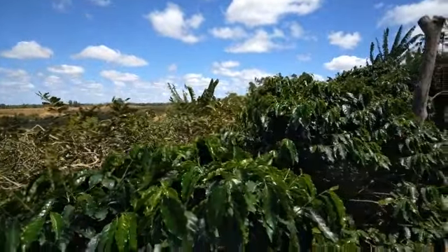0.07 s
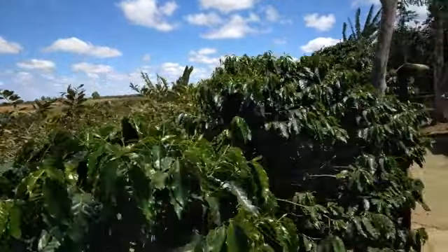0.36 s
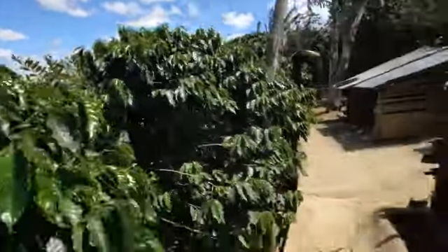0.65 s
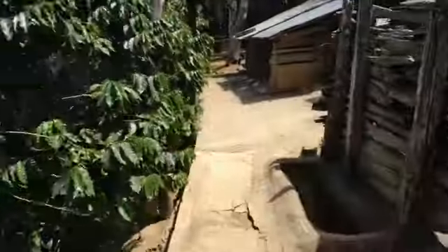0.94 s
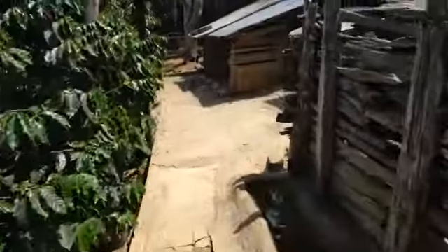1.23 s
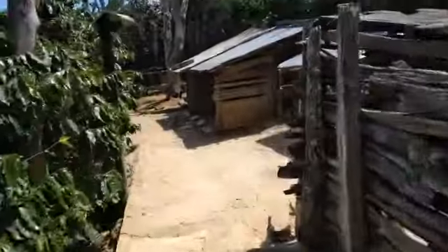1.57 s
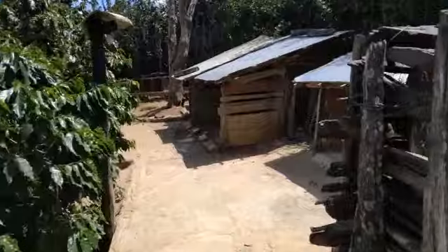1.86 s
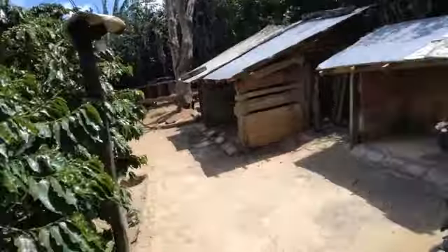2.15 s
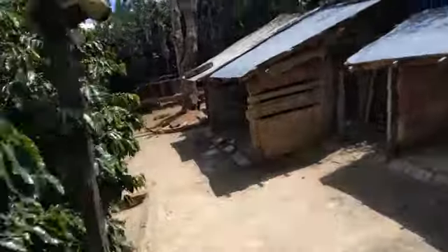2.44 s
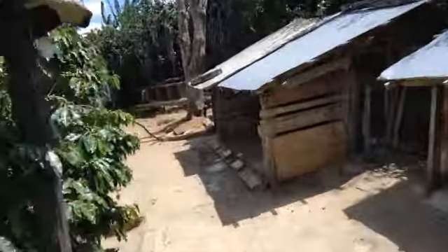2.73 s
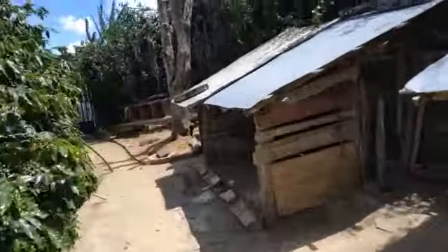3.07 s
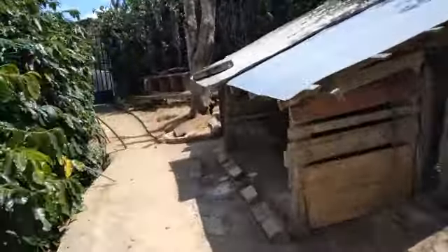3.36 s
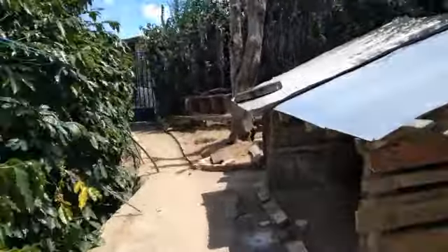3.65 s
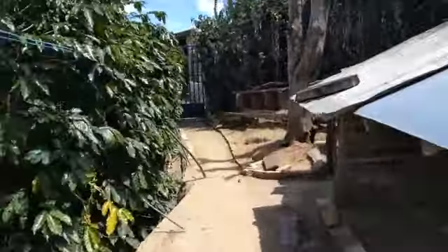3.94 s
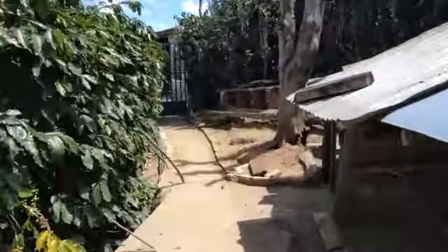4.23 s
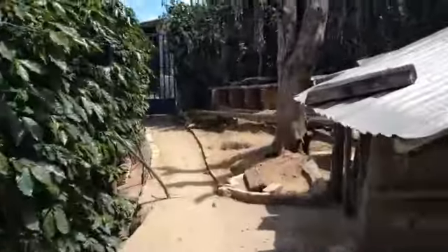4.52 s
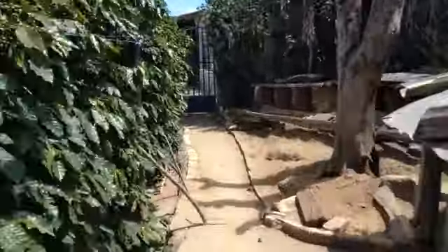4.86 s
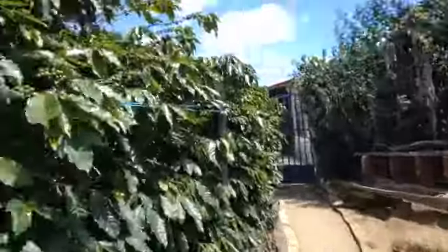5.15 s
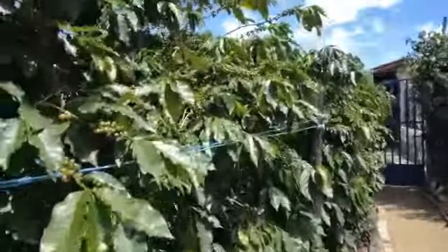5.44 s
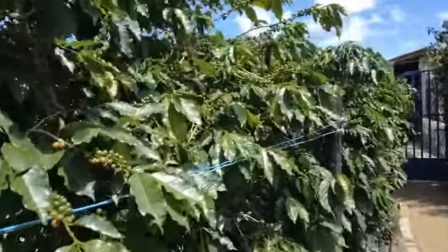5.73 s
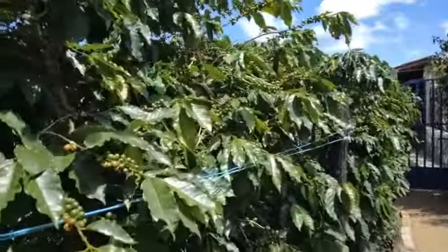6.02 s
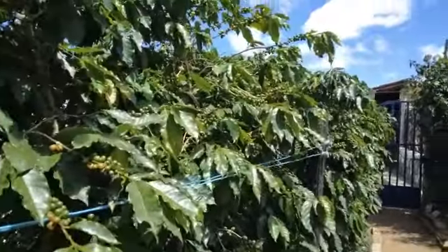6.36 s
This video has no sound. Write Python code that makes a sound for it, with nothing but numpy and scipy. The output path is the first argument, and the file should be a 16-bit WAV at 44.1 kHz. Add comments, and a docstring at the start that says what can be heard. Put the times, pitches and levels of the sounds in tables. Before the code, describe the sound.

Someone walks along a packed dirt path in a quiet yard, carrying a small stereo microphone. Air rumbles and puffs against it while soles and clothing swish, grit cracks, and the hand rubs and knocks on the hollow case. The swishes peak just past the middle, then the strongest gusts hit the left side. A few last swishes leave only soft rumble, faint rubbing and hush.

```python
"""Someone walks a packed dirt path in a quiet yard, carrying a small stereo camera.
From the start, moving air rumbles and puffs at the two microphone ports over a steady hush. Soles and
clothing swish with each stride, grit cracks underfoot, the hand rubs the hollow case, and footfalls
and fingers knock on it. The swishes peak just before 4 s and the strongest gusts hit the left port
near 5 s; a last few swishes then leave only soft rumble, faint rubbing and hush."""
import sys
import numpy as np
from scipy import signal
from scipy.fft import rfft, irfft
from scipy.io import wavfile
from scipy.ndimage import map_coordinates

SR = 44100
rng = np.random.default_rng(int(sys.argv[2]) if len(sys.argv) > 2 else 0)


def wrap_up_sound(samples):
    """Save the sound to the file named by the first command line argument, as 16-bit audio."""
    columns = np.atleast_2d(samples).T
    # keep every value between -1 and 1, then stretch to whole-number steps
    tamed = np.clip(columns, -1, 1)
    steps = np.round(tamed * 32767).astype(np.int16)
    wavfile.write(sys.argv[1], SR, steps)


N = 286209
TIME, BINS = np.arange(N) / SR, np.fft.rfftfreq(N, 1 / SR)

# boxy tone of rubbing that reaches the microphones through the case: freq_hz, gain_db
CASE_TONE = [(120, -5.5), (220, -5.5), (280, -6), (410, -4), (560, -6), (850, -14.5), (1100, -23.5),
             (1600, -33), (4000, -34.5)]


def gain_of(db):
    """Decibels to amplitude."""
    return 10 ** (np.asarray(db) / 20)


def unit_rms(x):
    """Scales to an rms of 1."""
    return x / np.sqrt(np.mean(x ** 2) + 1e-20)


def curve(points, hz, column=1):
    """One column of a spectrum table, joined on a log-frequency axis."""
    table = np.array(points, float)
    return np.interp(np.log(hz + 1), np.log(table[:, 0] + 1), table[:, column])


def add(mix, start_s, sound):
    """Mixes a sound in from start_s."""
    part = mix[:, max(round(start_s * SR), 0):][:, :sound.shape[-1]]
    part += sound[..., :part.shape[1]]


def pan(pan_db):
    """Left and right gains of mean power 1; positive leans left."""
    pair = np.array([gain_of(pan_db / 2), gain_of(-pan_db / 2)]).reshape(2, -1)
    return pair / np.sqrt((pair ** 2).mean(0))


def swell(peak_s, half_s):
    """A bell-shaped fade in and out, of height 1."""
    return np.exp(-((TIME - peak_s) / half_s) ** 2)


def drift(size, step):
    """Smooth random wander of rms 1, with a new value every step points."""
    knots = rng.standard_normal(size // step + 3)
    return unit_rms(map_coordinates(knots, [np.arange(size) / step], order=2, mode="nearest"))


def noise(colour_db, size, likeness=1):
    """Coloured stereo noise of rms 1; likeness 0 makes the two sides independent."""
    # how alike the two ports sound at likeness 1: freq_hz, correlation
    port_correlation = [(60, 1), (160, 0.77), (280, 0.96), (500, 0.79), (800, 0.46), (1300, -0.054),
                        (2200, 0.17), (3500, -0.11), (5000, -0.15), (6200, 0.27), (8500, 0.86),
                        (10500, 0.075), (14500, 0.98)]
    hz = np.fft.rfftfreq(size, 1 / SR)
    left, independent = rfft(rng.standard_normal((2, size)))
    shared = np.clip(likeness * curve(port_correlation, hz), -1, 1)
    right = shared * left + np.sqrt(1 - shared ** 2) * independent
    return unit_rms(irfft(np.array([left, right]) * gain_of(colour_db), size))


def hush(level_db=-71, pan_db=2.0):
    """The yard and the electronics lay a steady noise bed under everything."""
    # tone of the bed: freq_hz, gain_db
    hush_tone = [(100, 29), (400, 30), (800, 11.5), (1300, 7.5), (2500, 3.5), (5000, 4), (7200, 1),
                 (10000, -1), (15500, 2.5)]
    return gain_of(level_db) * noise(curve(hush_tone, BINS), N, likeness=0.67) * pan(pan_db)


def hums():
    """Now and then a faint low tone swells out of the rumble."""
    # brief hums: peak_s, level_db, pitch_hz, half_length_s
    hum_cues = [(2.534, -59, 109.4, 0.11), (3.733, -56.5, 125.2, 0.072), (5.34, -55.5, 114.3, 0.092),
                (6.163, -64, 142.2, 0.074)]
    return sum(gain_of(level_db) * np.sin(2 * np.pi * pitch_hz * TIME) * swell(peak_s, half_s)
               for peak_s, level_db, pitch_hz, half_s in hum_cues)


def air(swing_db=3, buffet_db=-9, buffet_pan_db=2, wander_db=0.95):
    """Eddies rumble unevenly at each port as the camera moves; gusts buffet mostly one port."""
    # level ride of the air passing the swinging camera: time_s, level_db
    flow_ride = [(0.0, -50.5), (0.11, -43.5), (0.25, -53.5), (0.72, -44.5), (1.0, -50), (1.24, -46.5),
                 (1.8, -48.5), (2.38, -43), (2.55, -54.5), (2.8, -48), (3.18, -54.5), (3.36, -42),
                 (3.62, -54), (3.97, -43), (4.3, -50.5), (4.75, -45.5), (5.3, -46.5), (5.5, -56.5),
                 (6.49, -54.5)]
    # sub-bass tone of the slow pressure swings: freq_hz, gain_db
    swing_tone = [(3, 11), (10, 8.5), (25, 8.5), (45, -1), (70, -25.5), (150, -67)]
    # bass tone of the buffeting: freq_hz, gain_db
    buffet_tone = [(25, -10.5), (55, 2), (85, -2.5), (130, -9.5), (190, -17), (300, -27), (700, -79.5)]
    # gusts on the ports: peak_s, level_db, half_length_s, pan_db
    gust_cues = [(0.13, -56.5, 0.16, 7), (0.349, -47.5, 0.079, -13), (0.615, -47, 0.1, 6.5),
                 (0.92, -51, 0.21, 9), (1.55, -43, 0.086, 11), (2.256, -57, 0.18, -4),
                 (3.5, -52.5, 0.06, 8), (3.97, -54, 0.12, 15), (4.653, -48.5, .06, -3.5),
                 (4.804, -40, 0.047, 18), (4.96, -41.5, 0.097, 20)]
    flow = gain_of(np.interp(TIME, *np.transpose(flow_ride)) + wander_db * drift(N, 2800))
    swings = gain_of(swing_db) * flow * noise(curve(swing_tone, BINS), N, likeness=0)
    buffet_power = (gain_of(buffet_db) * flow * pan(buffet_pan_db)) ** 2
    for peak_s, level_db, half_s, pan_db in gust_cues:
        buffet_power += (gain_of(level_db) * swell(peak_s, half_s) * pan(pan_db)) ** 2
    return swings + np.sqrt(buffet_power) * noise(curve(buffet_tone, BINS), N, likeness=0.28)


def puffs(trim_db=-3, half_cycles=0.67):
    """A few eddies thump a port with a single push and pull."""
    # puffs of air: centre_s, level_db (before trim), pitch_hz, pan_db
    puff_cues = [(0.099, -32, 41, 9), (0.619, -33.5, 42.6, 6), (0.734, -32, 35, -22), (1.385, -43, 109, -4),
                 (1.501, -32, 89, 25), (2.198, -33, 52, -6), (3.519, -31, 57.6, 29),
                 (4.795, -25.5, 72.4, 24), (4.98, -31, 187, 26), (4.9877, -21.5, 89, 40)]
    out, t = np.zeros((2, N)), np.arange(-SR // 20, SR // 20) / SR
    for centre_s, level_db, pitch_hz, pan_db in puff_cues:
        puff = np.sin(2 * np.pi * pitch_hz * t) * np.exp(-(t * pitch_hz / half_cycles) ** 2)
        add(out, centre_s + t[0], gain_of(level_db + trim_db) * puff * pan(pan_db))
    return out


def case_ring(pitch_hz, t60_s, upper_hz=830, upper_t60_s=0.013, attack_s=0.00029, size=6000):
    """The main mode of the case and a faint upper mode, muffled by the soft hand."""
    t = np.arange(size) / SR
    main = np.sin(2 * np.pi * pitch_hz * t) * gain_of(-60 * t / t60_s)
    upper = 0.05 * np.sin(2 * np.pi * upper_hz * t) * gain_of(-60 * t / upper_t60_s)
    attack = 1 - np.exp(-t / attack_s)
    muffle = signal.butter(3, 1100, fs=SR, output="sos")
    return signal.sosfilt(muffle, -(main + upper) * attack)


def grip(rub_db=-2.5, creak_db=-4, flutter_db=2.5, creaks_per_s=170):
    """Skin rubs the case unevenly and small slips ring it; a sliding hand adds a brighter dry rub."""
    # level ride of the hand on the case: time_s, level_db
    grip_ride = [(0.0, -67), (0.42, -70.5), (0.55, -63), (1.1, -63), (1.8, -58.5), (1.95, -66),
                 (2.15, -64.5), (2.42, -66.5), (2.56, -62), (3.0, -63.5), (3.38, -69), (3.8, -60),
                 (4.2, -67), (4.45, -68.5), (4.95, -64), (5.5, -72), (6.0, -69.5), (6.49, -69)]
    # slides of the hand: peak_s, level_db, half_length_s
    slide_cues = [(0.61, -68.5, 0.068), (0.945, -73, 0.046), (1.503, -84, 0.072), (1.79, -66, 0.094),
                  (3.666, -72, 0.12)]
    # tone of dry skin sliding: freq_hz, gain_db
    skin_tone = [(300, -12), (600, 7.5), (900, 5), (1100, -11), (1350, -24.5), (2500, -50)]
    flutter = gain_of(flutter_db * drift(N, 900))
    slips = rng.uniform(-1.13, 1, N) * (rng.random(N) < creaks_per_s / SR)
    ring = case_ring(pitch_hz=392.5, t60_s=0.028)
    creaks = gain_of(creak_db) * unit_rms(signal.oaconvolve(slips, ring)[:N])
    rub = gain_of(rub_db) * noise(curve(CASE_TONE, BINS), N)
    hollow = gain_of(np.interp(TIME, *np.transpose(grip_ride))) * (rub + creaks)
    sliding = sum(gain_of(level_db) * swell(peak_s, half_s) for peak_s, level_db, half_s in slide_cues)
    return flutter * (hollow + sliding * noise(curve(skin_tone, BINS), N))


def snap(hit_s, level_db, centre_hz, t60_s, narrowness_db=7, size=4096):
    """A short noise burst in one broad band, its top dulled by dust; returns (start_s, sound)."""
    hz = np.fft.rfftfreq(size, 1 / SR)
    t = np.arange(size) / SR - 0.005  # pre-roll gives the filter room ahead of the hit
    decay = gain_of(-60 * np.maximum(t, 0) / t60_s) * (t >= 0)
    burst = noise(np.zeros(len(hz)), size) * decay
    dust_db = curve([(11000, 8), (14000, -5)], hz)
    band = unit_rms(gain_of(dust_db - narrowness_db * np.log2((hz + 50) / centre_hz) ** 2))
    return hit_s + t[0], gain_of(level_db) * irfft(rfft(burst) * band, size)


def grit(trim_db=-7):
    """Single grains crack under the sole, each in its own band."""
    # snaps and crunches: start_s, level_db (before trim), centre_hz, t60_s
    grit_cues = [(0.4904, -42.5, 9550, 0.015), (0.4937, -49.5, 3400, 0.018), (0.522, -63, 795, 0.029),
                 (1.363, -65, 1240, 0.038), (1.371, -45.5, 1090, 0.07), (1.908, -42, 2200, .016),
                 (1.985, -55, 3020, .018), (2.387, -56, 2800, 0.048), (2.417, -38, 10500, .007),
                 (2.929, -45.5, 4620, 0.075), (2.936, -48, 3050, 0.049), (3.441, -36.5, 6600, 0.0062),
                 (3.537, -60, 2480, .03), (4.027, -67, 5000, 0.018), (4.427, -66.5, 7800, 0.053),
                 (4.467, -48.5, 1200, 0.011), (4.892, -35.5, 1370, 0.018)]
    out = np.zeros((2, N))
    for start_s, level_db, centre_hz, t60_s in grit_cues:
        add(out, *snap(start_s, level_db + trim_db, centre_hz, t60_s))
    return out


def knocks(case_hz=420, loaded_t60_s=0.01, crack_db=-20.5):
    """Footfalls and shifting fingers jolt the case: a hollow ring with a short crack on top."""
    # dull knocks: start_s, level_db, t60_s
    knock_cues = [(0.323, -54, 0.053), (0.492, -41, 0.024), (0.524, -44, 0.024), (0.618, -45.5, 0.069),
                  (0.778, -39.5, 0.018), (0.8322, -36.5, 0.057), (1.242, -46, 0.042), (1.36, -41, 0.026),
                  (1.477, -46.5, 0.12), (1.874, -27.5, 0.0088), (2.339, -51, 0.027), (2.397, -43, 0.034),
                  (2.88, -35.5, 0.0073), (3.1568, -39.5, 0.018), (3.594, -47.5, 0.077), (3.958, -41, 0.025),
                  (4.0956, -30.5, 0.0082), (4.13, -50.5, 0.017), (4.407, -43, 0.019), (4.467, -41.5, 0.018),
                  (4.622, -33.5, .01), (4.891, -43.5, 0.036)]
    out = np.zeros((2, N))
    for start_s, level_db, t60_s in knock_cues:
        pitch_hz = case_hz * (1 - np.exp(-t60_s / loaded_t60_s))  # a damping finger drags the pitch down
        add(out, start_s, gain_of(level_db) * case_ring(pitch_hz, t60_s))
        add(out, *snap(start_s, level_db + crack_db, centre_hz=790, t60_s=0.02, narrowness_db=25))
    return out


def sand(colour_db, size, grains_per_s=220, level_db=-10):
    """Separate fine grains tick within a swish, in the colour of its hiss."""
    ticks = rng.standard_normal((2, size)) * (rng.random(size) < grains_per_s / SR)
    return gain_of(level_db) * unit_rms(irfft(rfft(ticks) * gain_of(colour_db), size))


def stroke(t, half_s, rise_stretch=1.073, fall_stretch=0.91, steepness=1.8, hold_s=0.072):
    """A limb gathers speed a little more slowly than it stops; returns (envelope, crossfade angle)."""
    length_s = half_s * np.where(t < 0, rise_stretch, fall_stretch)
    # a long stroke holds its speed, then stops as briskly as a short one
    envelope = np.exp(-abs(t / length_s) ** (steepness + length_s / hold_s))
    return envelope, np.pi / 4 * (1 + np.tanh(2 * t / length_s))


def swishes(hiss_db=0.5, ripple_db=3.0, grain_db=1.5, gap_db=4, gap_octaves=0.45, size=32768):
    """Sole or cloth brushes past: countless tiny slips make a hiss and stir the case."""
    # strokes: peak_s, level_db, half_length_s, tilt_db_per_octave, case_db (relative to level), gap_hz
    swish_cues = [(0.119, -73.5, 0.016, -0.5, 1, 4000), (0.278, -63, 0.019, 2, -3, 4700),
                  (0.518, -71.5, 0.019, 3.5, -5, 3900), (0.721, -63, 0.031, 1, 1, 3600),
                  (0.771, -55.5, 0.029, 1, -24, 2900), (0.854, -62.5, 0.031, 0, 7.5, 1980),
                  (0.921, -55.5, 0.035, 0, -6, 4670), (1.083, -62.5, 0.043, 0.5, 3.5, 4700),
                  (1.384, -55.5, 0.038, 2, 0, 4000), (1.423, -60, 0.029, 3.5, -21, 4060),
                  (1.494, -75.5, 0.024, 4, 15, 4000), (1.636, -60, .05, 1.5, -23, 11100),
                  (1.707, -62, 0.035, 3.5, -6, 3840), (1.875, -54, 0.039, -1, 4, 7500),
                  (1.914, -56, 0.023, 0.5, -5, 2000), (1.994, -67.5, 0.017, 0, 3, 3800),
                  (2.088, -74.5, 0.019, 5, 11.5, 4000), (2.147, -69.5, 0.017, 2.5, 3.5, 7000),
                  (2.398, -56.5, 0.038, 1.3, 1.5, 7060), (2.496, -65, 0.018, -0.3, 4, 7000),
                  (2.79, -60.5, 0.03, 2.5, 1.5, 6340), (2.824, -60, 0.022, 1.5, 1.5, 5500),
                  (2.956, -57, 0.054, 1, 0.5, 6940), (3.02, -61, 0.036, 0.7, -4, 6540),
                  (3.411, -64.5, .03, 4, 0.5, 4000), (3.457, -58.5, 0.031, 2, -4, 6570),
                  (3.547, -66.5, 0.017, -1.3, -9, 7700), (3.673, -55, 0.07, 4, -2.5, 3520),
                  (3.81, -56, 0.13, 2.5, -8.5, 7500), (3.925, -49.5, .04, 1, -2.5, 7400),
                  (4.042, -65.5, 0.02, 1, -2, 3120), (4.466, -60, 0.03, 1.6, 1.5, 6700),
                  (4.626, -73, 0.02, -9.5, 10.5, 2520), (4.92, -51, 0.037, 1.5, -0.5, 2070),
                  (4.996, -57.5, 0.042, 0, -6.5, 2120), (5.032, -58.5, 0.021, 0.5, -1, 2120),
                  (5.267, -53, 0.027, 3.5, -16, 4220), (5.414, -58, .028, 3.5, -15, 2830),
                  (5.578, -60.5, 0.027, 3, -36, 4250), (5.863, -73.5, .019, 1.5, 0, 7040)]
    # tone of the friction hiss: freq_hz, gain_db
    friction_tone = [(300, -4), (900, 3), (1400, -1), (2000, 2.5), (2600, -0.5), (3500, 2), (6000, 0),
                     (8500, -2.5), (12000, -6), (15500, -12)]
    out, hz = np.zeros((2, N + size)), np.fft.rfftfreq(size, 1 / SR)
    t = (np.arange(size) - size // 2) / SR
    friction_colour, case_colour = curve(friction_tone, hz), curve(CASE_TONE, hz)
    for peak_s, level_db, half_s, tilt, case_db, gap_hz in swish_cues:
        envelope, crossfade = stroke(t, half_s)
        # the gap between the rubbing surfaces resonates
        gap_boost = gap_db * np.exp(-(np.log2((hz + 1) / gap_hz) / gap_octaves) ** 2)
        colour = friction_colour + tilt * np.log2(np.maximum(hz, 1200) / 4500) + gap_boost
        # reflections off ground and body ripple the spectrum, and the ripple shifts as the limb moves
        early, late = (noise(colour + ripple_db * drift(len(hz), 130), size) for _ in range(2))
        friction = np.cos(crossfade) * early + np.sin(crossfade) * late
        hiss = gain_of(hiss_db) * (friction + sand(colour, size))
        slips = gain_of(grain_db * unit_rms(drift(size, 40) + drift(size, 300)))
        hollow = gain_of(case_db) * noise(case_colour, size)
        add(out, peak_s, gain_of(level_db) * envelope * slips * (hiss + hollow))
    return out[:, size // 2:][:, :N]  # centres each stroke on its cue


def scene():
    """The walk, the handling noise, the air and the background, mixed at the camera."""
    return swishes() + knocks() + grit() + grip() + air() + puffs() + hums() + hush()


def record(dry, cutoff_hz=15800):
    """Each port rings at its own treble resonance; a steep low-pass then cuts the very top."""
    # tone of the two microphone ports: freq_hz, left_db, right_db
    port_tone = [(1080, 1, 0.5), (3130, 0, 1), (4280, -0.5, -3), (5000, -2.5, -2.5), (6300, -0.5, -8.5),
                 (6640, -0.5, 0.5), (7340, 5.5, -15), (8140, -6, -7.5), (9200, -8.5, -4.5), (10300, -15, 1),
                 (10950, -19, -4), (13350, -12.5, -14), (14800, -14, -11)]
    ports = gain_of([curve(port_tone, BINS, column=1), curve(port_tone, BINS, column=2)])
    coloured = irfft(rfft(dry) * ports, N)
    low_pass = signal.firwin(511, cutoff_hz, window=("kaiser", 9), fs=SR)
    return signal.oaconvolve(coloured, low_pass[None], "same")


dry = scene()
out = record(dry)
wrap_up_sound(out)
```